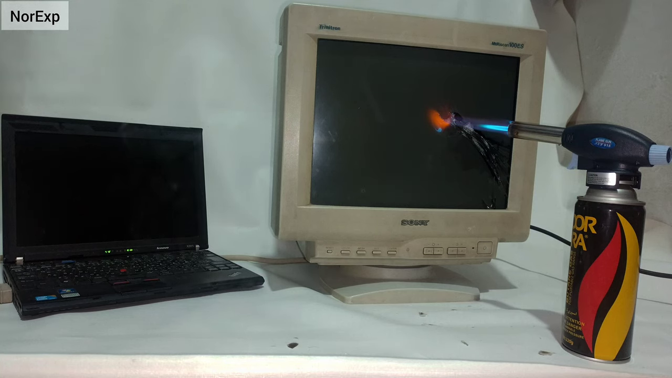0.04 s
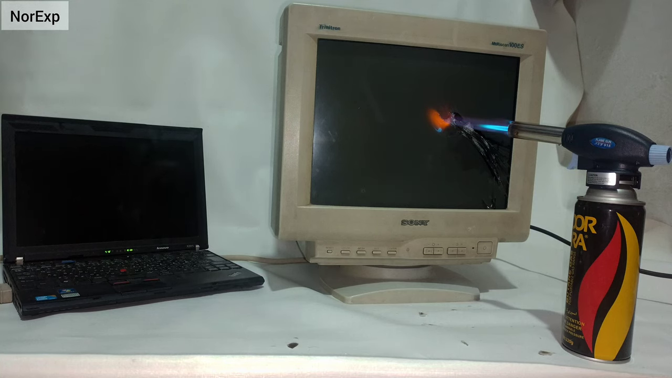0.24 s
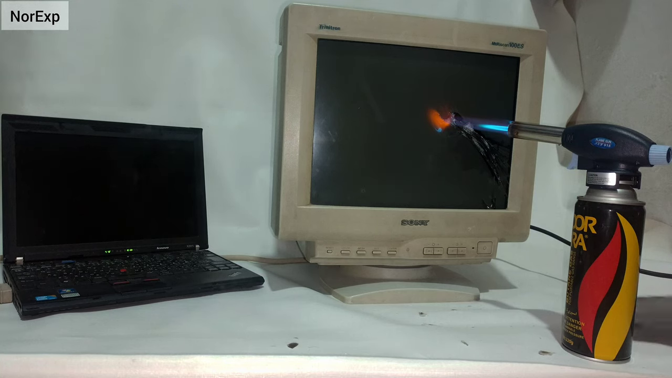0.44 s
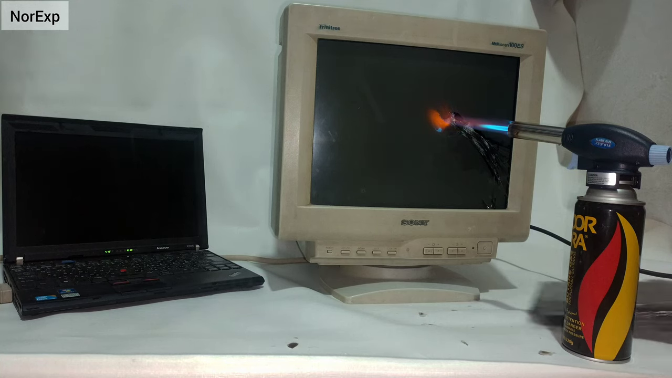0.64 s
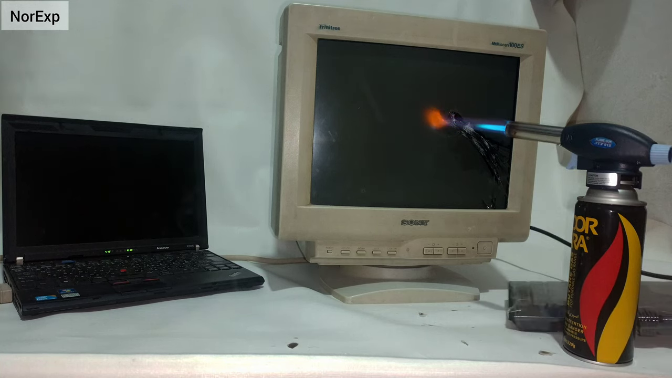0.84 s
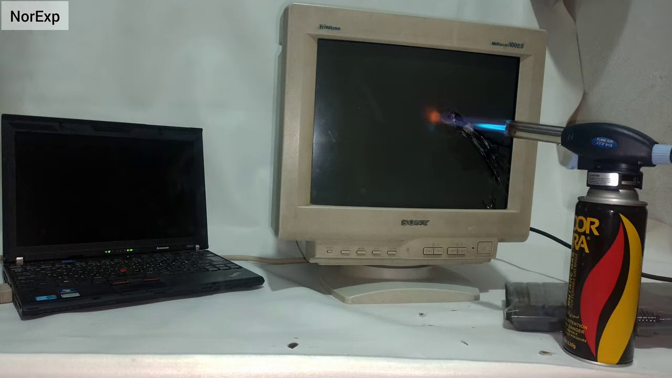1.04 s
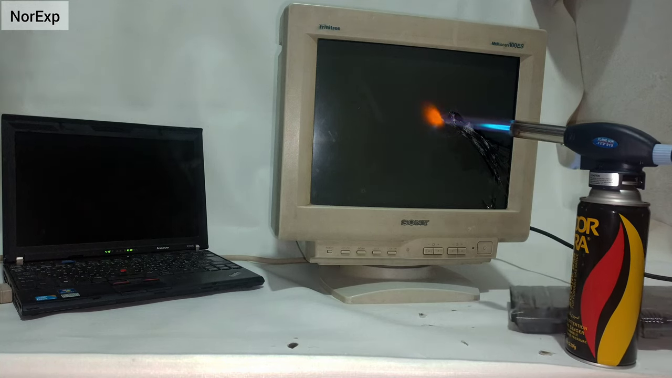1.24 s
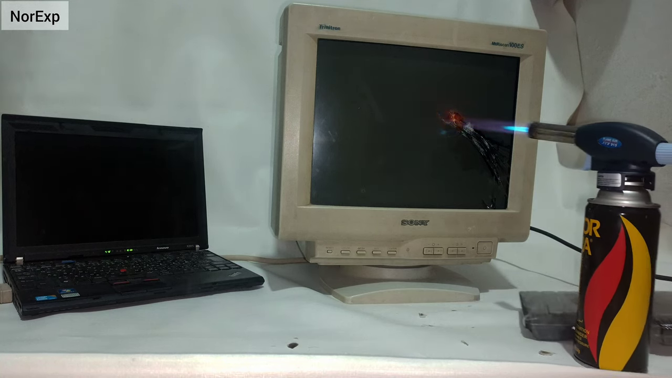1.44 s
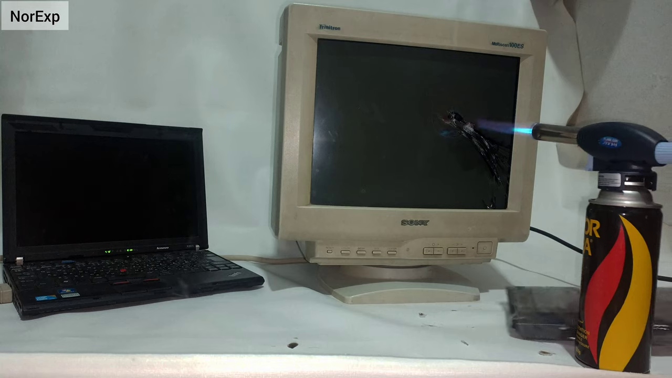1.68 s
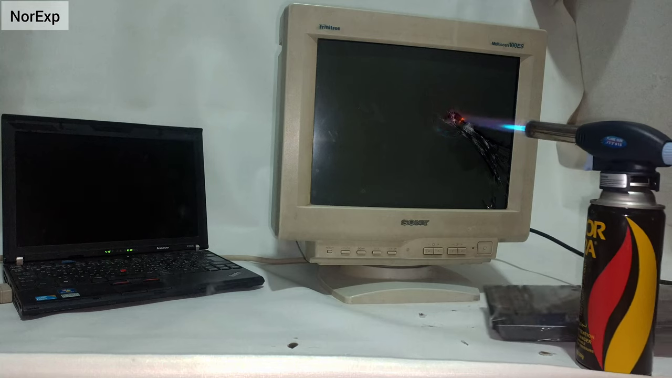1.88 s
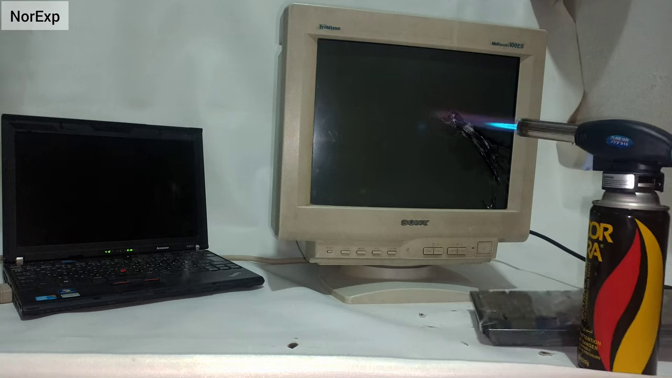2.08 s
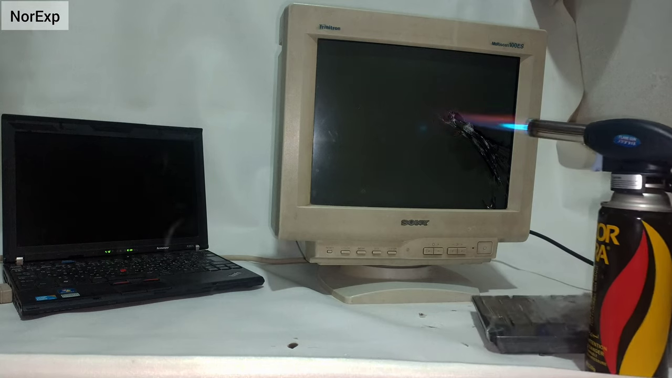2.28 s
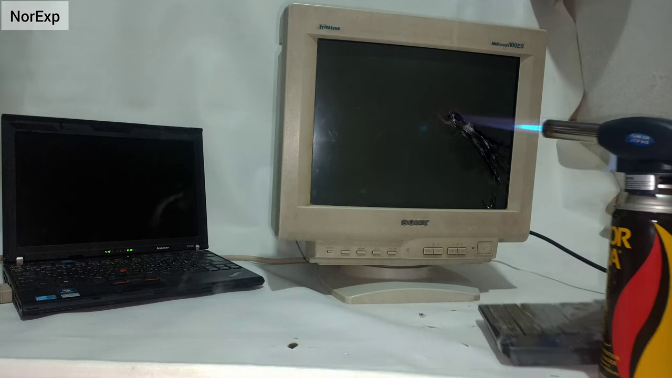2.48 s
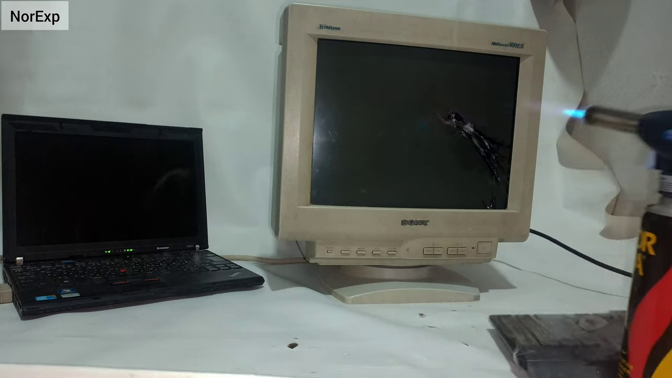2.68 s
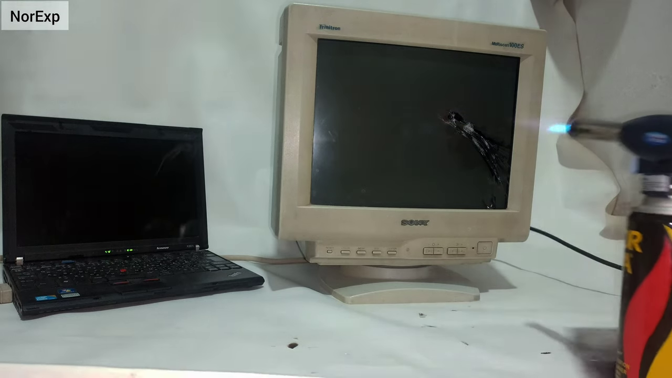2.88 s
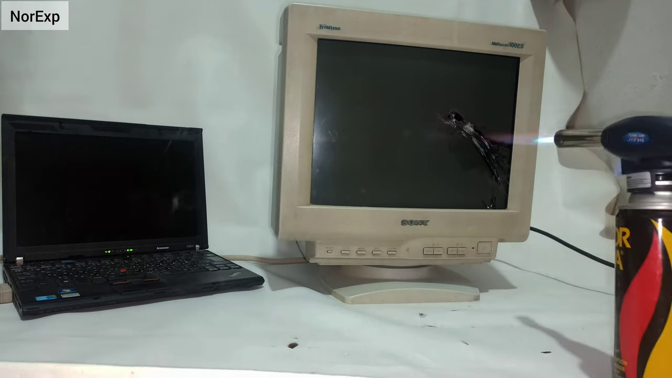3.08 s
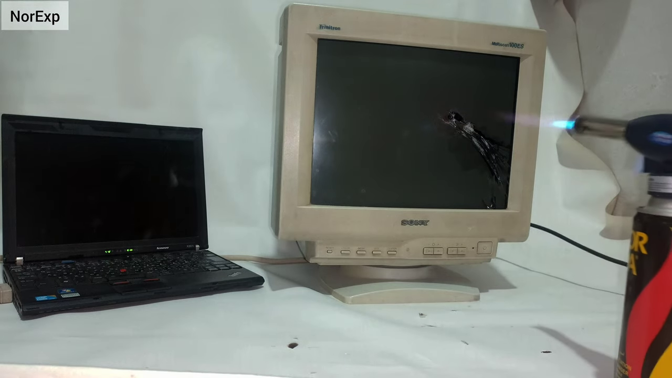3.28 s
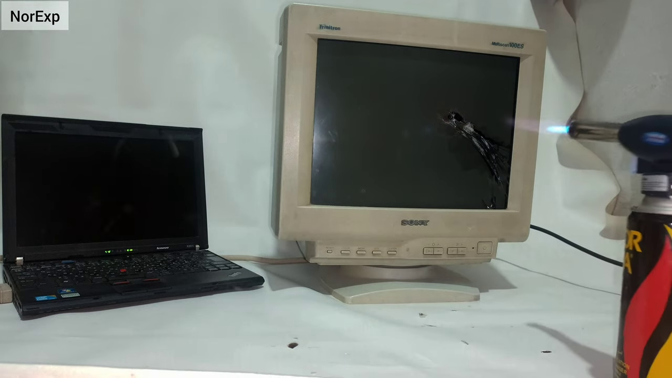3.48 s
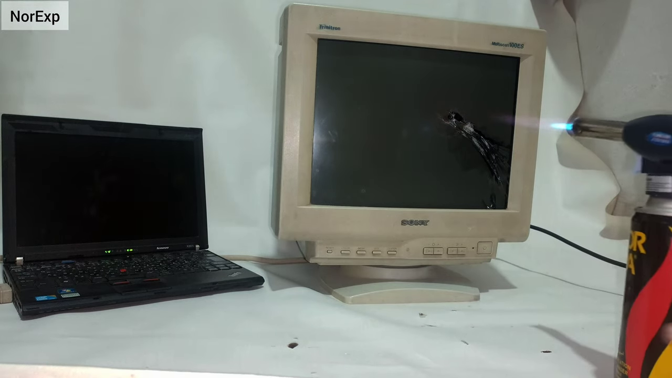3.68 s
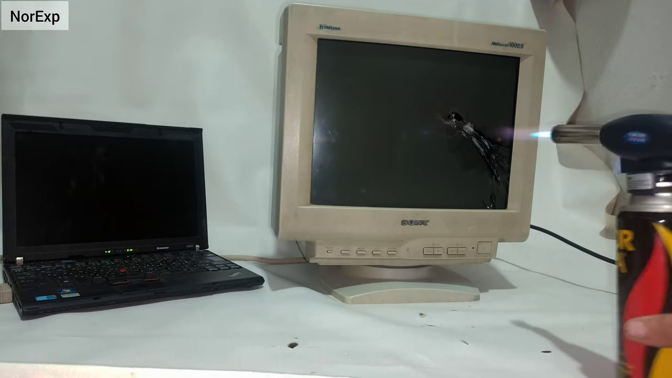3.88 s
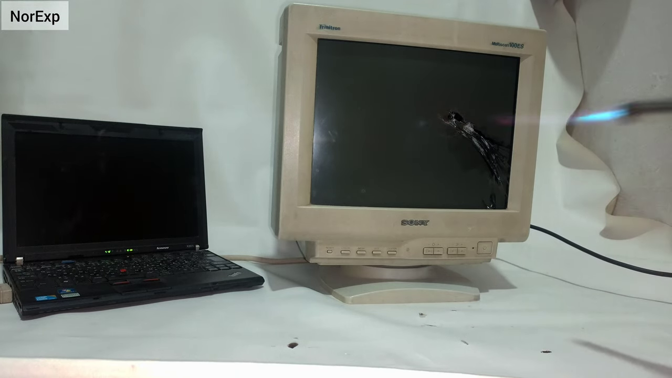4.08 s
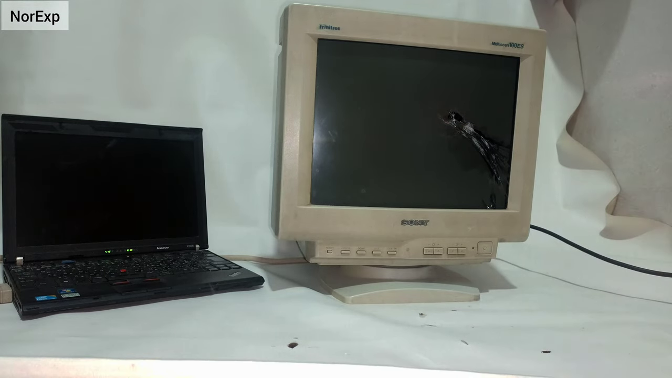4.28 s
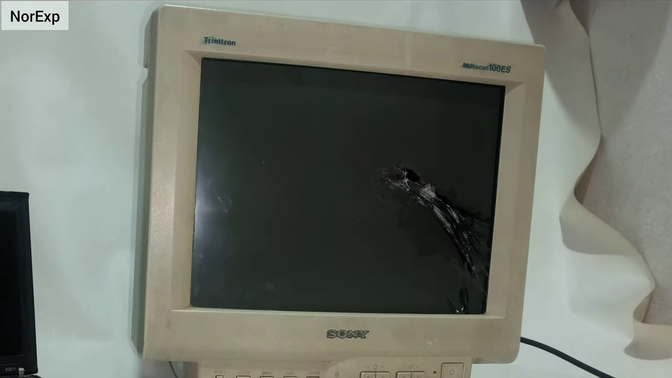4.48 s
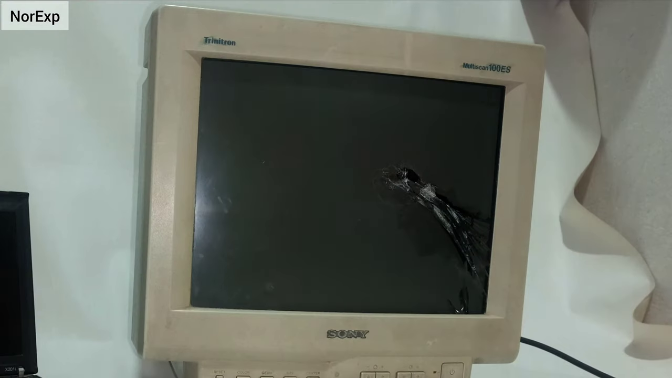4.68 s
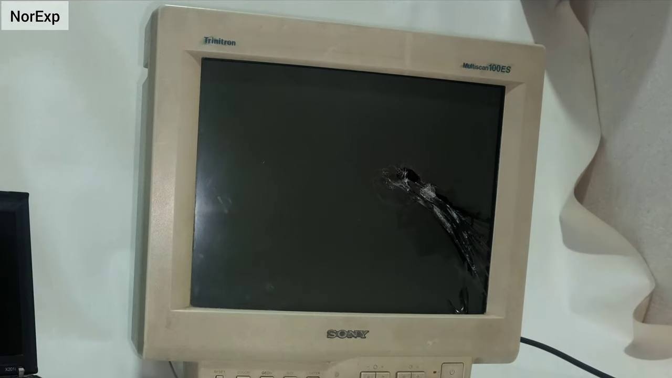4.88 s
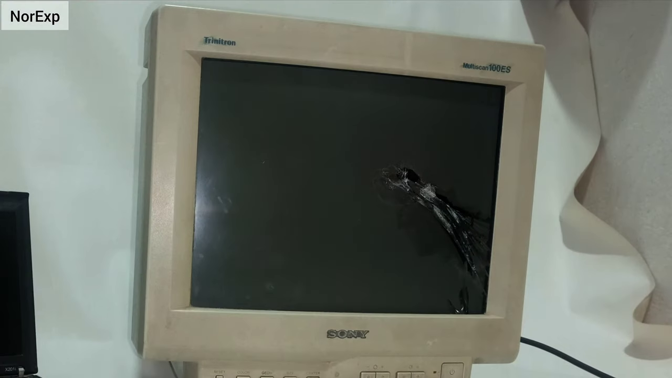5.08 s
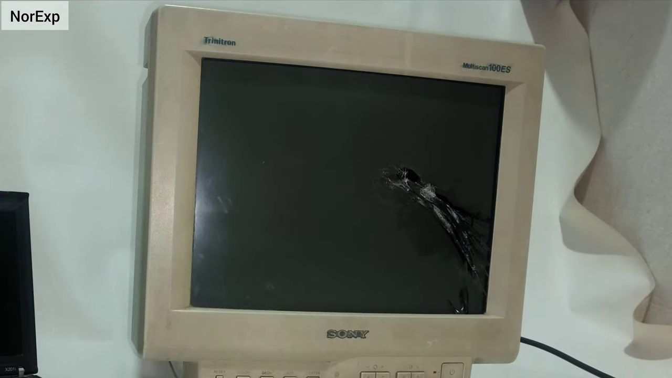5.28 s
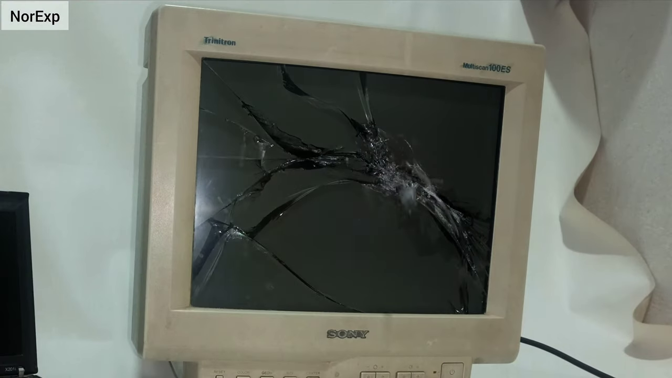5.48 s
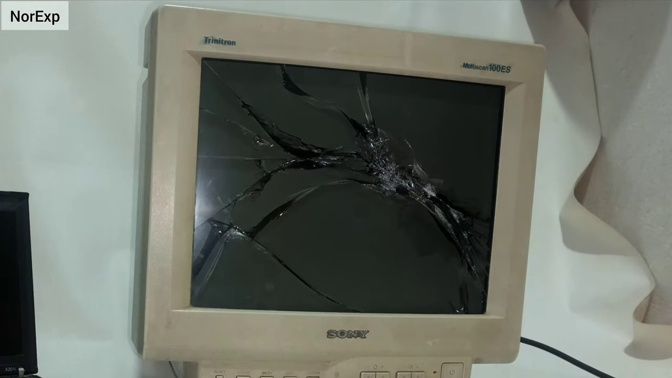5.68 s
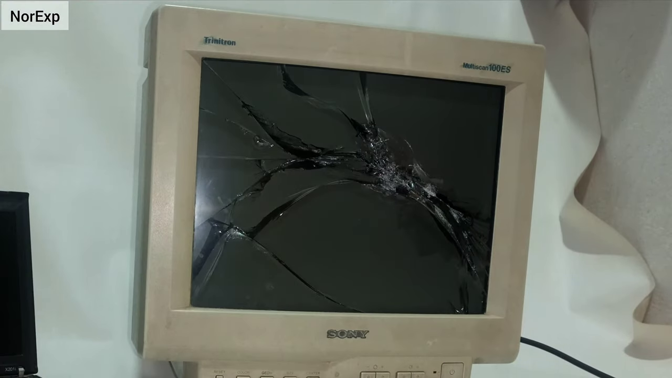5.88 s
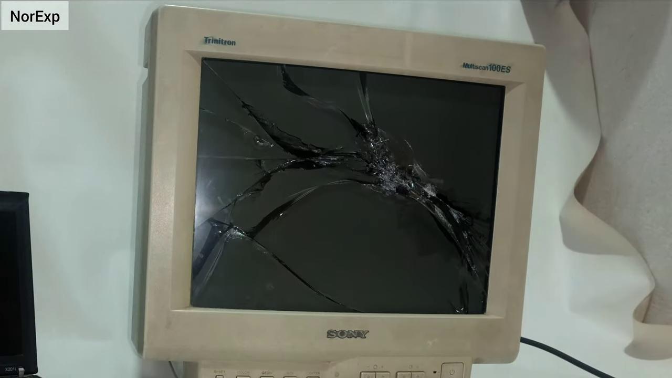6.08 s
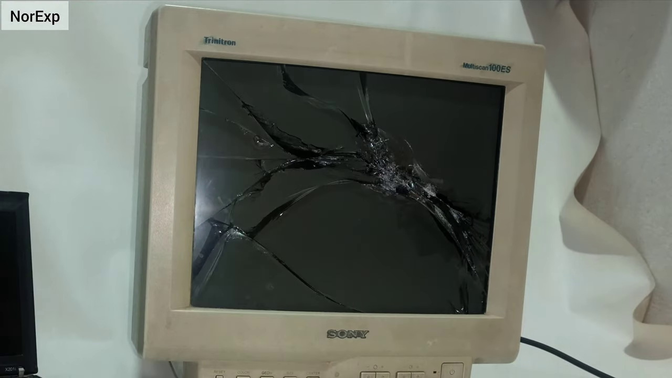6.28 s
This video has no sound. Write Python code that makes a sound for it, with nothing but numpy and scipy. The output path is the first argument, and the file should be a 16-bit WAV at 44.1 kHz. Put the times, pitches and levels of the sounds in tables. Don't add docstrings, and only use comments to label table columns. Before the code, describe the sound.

From the start a gas torch burns close to the microphone in a small room: a low, fluttering roar under a broad rushing hiss. Around 0.7 s a dull bump lands on the table, and at 0.84 s the steel can gets a knock with a brief thin ring. Glass ticks at 1.5 s, then more thickly from 2.85 to 3.4 s, with a few later clicks, as the flame draws back and its roar thins. At 4.35 s the torch vanishes abruptly into near silence: faint wavering hum, rumble, air and tiny cooling ticks. At 5.53 s a loud, sharp snap rings the heavy glass low and briefly, and a bright crackling rush of fractures spreads. Splinters and grit fall; heavier pieces rattle in a dense, damped cluster from 5.7 to 5.8 s, then thin out. A second, smaller crack comes at 6.12 s, followed by sparse tinkles to the end.

```python
import sys
import numpy as np
from scipy import signal
from scipy.fft import rfft, irfft, next_fast_len
from scipy.io import wavfile
from scipy.ndimage import uniform_filter1d, map_coordinates

SR = 44100
rng = np.random.default_rng(int(sys.argv[2]) if len(sys.argv) > 2 else 0)


def persist_wave(psi):
    counts = np.round(np.clip(psi, -1, 1) * 32767).astype(np.int16)
    wavfile.write(sys.argv[1], SR, np.atleast_2d(counts).T)


def gain_from_db(level_db):
    decades = np.asarray(level_db, float) / 20
    return 10 ** decades


N = 279594
CUT = 4.346
TOP_HZ = 15600


def unit(x):
    return x / np.sqrt(np.mean(x ** 2) + 1e-20)


def along(points, hz):
    f, v = np.transpose(points)
    return np.interp(np.log(hz + 1), np.log(f + 1), v)


def curves(rows):
    s, *cols = np.transpose(rows)
    return [np.interp(np.arange(N) / SR, s, c) for c in cols]


def wobble(rate):
    knots = rng.standard_normal(int(N * rate / SR) + 4)
    return map_coordinates(knots, [np.arange(N) * rate / SR])


def filtered(x, response):
    m = next_fast_len(len(x) + min(8192, 3 * len(x)))
    return irfft(rfft(x, m) * response(np.fft.rfftfreq(m, 1 / SR)), m)[:len(x)]


def coloured(x, spectrum):
    return unit(filtered(x, lambda hz: gain_from_db(along(spectrum, hz))))


def even(blow, share):
    spectrum = rfft(blow)
    return irfft(spectrum / (np.abs(spectrum) + 1e-9) ** share, len(blow))


def add(track, s, sound):
    spot = track[round(s * SR):][:len(sound)]
    spot += sound[:len(spot)]


def patchy(patchy_db, drift_db=0):
    z = signal.stft(rng.standard_normal(N), nperseg=512)[2]
    field = uniform_filter1d(uniform_filter1d(rng.standard_normal(z.shape), 5, 0), 12, 1)
    ridges = uniform_filter1d(uniform_filter1d(rng.standard_normal(z.shape), 4, 0), 110, 1)
    gain_db = patchy_db * unit(field) + drift_db * unit(ridges)
    return signal.istft(z * gain_from_db(gain_db), nperseg=512)[1][:N]


def breaks(rate, spread_db):
    size = gain_from_db(spread_db * np.minimum(rng.exponential(size=N), 2))
    return unit((rng.random(N) < rate / SR) * np.sign(rng.standard_normal(N)) * size)


def ring(modes, length, attack=0.00062):
    t = np.arange(int(length * SR)) / SR
    total = 0
    for hz, db, t60 in modes:
        drift = np.cumsum(rng.standard_normal(len(t))) * hz * 2e-6
        total = total + gain_from_db(db - 60 * t / t60) * np.sin(2 * np.pi * hz * t + drift)
    return (1 - np.exp(-t / attack)) * total


# pitch_hz [Hz], t60_s [s]
ROOM = [(200, 0.19), (2000, 0.2), (8000, 0.2), (15000, 0.084)]


def echoed(sound, wet_db):
    hz, t, z = signal.stft(rng.standard_normal(SR // 3), SR, nperseg=256)
    tail = signal.istft(z * gain_from_db(-60 * t / along(ROOM, hz)[:, None]), SR, nperseg=256)[1]
    late_tail = np.pad(tail / np.linalg.norm(tail), (130, 0))
    wet = gain_from_db(wet_db) * signal.fftconvolve(sound, late_tail)
    add(wet, 0, sound)
    return wet


# pitch_hz [Hz], level_db [dB per Hz]
CLICK = [(100, -41), (500, -2.5), (2000, -2), (6500, -4.5), (9500, -5.5), (10500, -17.5), (13500, -21.5),
         (15200, -11.5), (16500, -24)]


def as_click(x):
    return coloured(x, CLICK)


# middle_s [s], half_length_s [s], from_hz [Hz], to_hz [Hz], level_db [dB]
COMBING = [(1.4, .35, 3500, 4800, 2), (1.75, 0.77, 1500, 1340, 3), (2.15, 0.61, 960, 750, -6.5),
           (2.04, 0.53, 3900, 3300, -4.5), (1.82, 0.29, 3350, 3200, 4.5), (2.2, .5, 8300, 8800, 0),
           (2.25, 0.37, 12000, 9200, -3.5), (3.8, 0.1, 1100, 980, 3), (2.88, 0.24, 1800, 1600, 1),
           (4.17, 0.14, 5400, 3800, 5), (4, 0.17, 650, 760, 2), (4.3, 0.21, 396, 360, -8),
           (3.55, 0.23, 3200, 3100, 2), (2.95, 0.16, 7100, 6800, 1.5), (1.28, 0.31, 6300, 6800, -1),
           (.5, .4, 6400, 6200, 1.5), (1.8, .4, 11500, 11200, 1.5), (4.31, 0.043, 11300, 8800, 5),
           (3.74, 0.4, 740, 680, -6.5), (1.5, 0.21, 990, 680, -2.5), (1.27, 0.23, 3700, 4100, -3.5),
           (0.14, 0.13, 410, 360, -4)]


def combed(x):
    half_width_octaves = 0.17
    hz, t, z = signal.stft(x, SR, nperseg=1024)
    gain_db = 0
    for s, half, from_hz, to_hz, db in COMBING:
        u = np.clip((t - s) / half, -1, 1)
        centre = from_hz + (to_hz - from_hz) * (u + 1) / 2
        octaves_off = np.log2((hz[:, None] + 1) / centre)
        gain_db = gain_db + db * (1 - u ** 4) * np.exp(-(octaves_off / half_width_octaves) ** 2)
    return signal.istft(z * gain_from_db(gain_db), nperseg=1024)[1][:N]


def sizzle():
    rest_db, stirred_db, stirred_s = -54.5, -31.5, 0.054
    t = np.arange(N) / SR
    gain = gain_from_db(rest_db)
    for s, db, hz, *_ in HOT:
        if hz > 4500:
            gain = gain + gain_from_db(db + stirred_db) * np.exp(-np.abs(t - s) / stirred_s)
    return gain * as_click(echoed(breaks(rate=1200, spread_db=3.5), wet_db=-3.5)[:N])


# pitch_hz [Hz], level_db [dB per Hz]
ROAR_ON = [(18, -74.5), (30, -30.5), (65, -19.5), (100, -18), (150, -13.5), (282, -3.5), (319, -12.5),
           (362, -1), (459, 1.5), (555, -4.5), (703, -2.5), (919, -17), (1030, -10.5), (1300, -44.5),
           (1690, -60.5), (2860, -120)]
ROAR_OFF = [(18, -65), (38, -43), (60, -16), (100, -14.5), (167, -11.5), (209, -6), (314, -8), (368, 1.5),
            (411, -8), (459, -2), (555, -17), (725, -13.5), (863, -10), (1300, -24), (1690, -43.5),
            (2860, -120)]
RUSH_ON = [(710, -44.5), (1200, -18), (1450, -4), (1590, 1.5), (2020, -5), (2190, 0.5), (2410, -3),
           (3070, 1), (4040, -7.5), (4600, -9.5), (5980, -38.5), (10100, -120)]
RUSH_OFF = [(710, -25.5), (1200, 0.5), (1300, -2.5), (1400, 2), (1620, -5.5), (1890, 1.5), (2670, -6),
            (3190, -1.5), (3610, -7.5), (4600, -3.5), (5980, -33), (10100, -120)]
HISS_ON = [(2530, -45.5), (4300, -15.5), (5000, -1.5), (5670, -4.5), (6350, 6.5), (6740, 2), (7600, -20),
           (8650, -16.5), (9330, -6.5), (10500, -25.5), (11300, -20), (12300, -30), (14000, -34.5),
           (14900, -18.5), (15700, -29.5)]
HISS_OFF = [(2530, -34.5), (4300, -16.5), (5090, -2.5), (5980, -10), (6600, 1), (6960, -4.5), (7640, -19),
            (9380, -5.5), (9800, -9), (10100, -27.5), (10500, -18), (11300, -17), (13600, -36.5),
            (14900, -20.5), (15700, -14.5)]
# time_s [s], gas_flow_db [dB], drawn_off [0-1]
FLAME = [(0, -0.5, 0.03), (.4, -1, 0.27), (.66, 0, 0.2), (1.0, 0, 0.22), (1.45, 0.5, 0.35),
         (1.6, -0.5, 0.26), (2.3, 1.6, 0.56), (2.8, 0, 0.87), (3.1, -0.9, 0.78), (3.45, -0.2, 0.81),
         (3.9, -1, 0.69), (4.16, 0.5, 0.83), (4.34, 2.5, 0.73)]


def torch():
    flow_db, away = curves(FLAME)
    away = np.clip(away, 0, 1)

    def walled(x, spectrum):
        return coloured(echoed(x, wet_db=-7.0)[:N], spectrum)

    def blend(x, on, off, u):
        mixed = unit((1 - u) * walled(x, on) + u * walled(x, off))
        return mixed * (1 + 0.34 * u * (1 - u))

    flutter = wobble(45)
    roar = blend(patchy(patchy_db=0.05), ROAR_ON, ROAR_OFF, away)
    roar = unit(gain_from_db(0.96 * flutter + 0.3 * wobble(7.8)) * roar)
    rush = blend(patchy(patchy_db=1.0, drift_db=1.5), RUSH_ON, RUSH_OFF, away)
    rush = unit(gain_from_db(0.24 * flutter) * rush)
    hiss = blend(patchy(patchy_db=1.0, drift_db=1.54), HISS_ON, HISS_OFF, away ** 0.75)
    hiss = unit(gain_from_db(0.53 * flutter + 0.58 * wobble(300)) * hiss)
    flame = gain_from_db(-34 - 5.5 * away + 0.18 * flow_db) * roar
    flame = flame + gain_from_db(-45 + 0.86 * away + 0.98 * flow_db) * rush
    flame = flame + gain_from_db(-42.5 - 2 * away + 1.2 * flow_db) * hiss
    lit = np.clip((CUT - np.arange(N) / SR) / 0.00044, 0, 1)
    return lit * filtered(combed(flame) + sizzle(), lambda hz: hz < TOP_HZ + 250)


# start_s [s], peak_db [dB], pitch_hz [Hz],
# t60_s [s]
BUMP = [(.671, -3.5, 280, .036), (.671, -20, 150, .1), (.703, -24, 430, .12), (.737, -25, 520, .12),
        (5.84, -51, 330, .15), (5.91, -50, 260, .15), (5.96, -54, 380, .15), (3.063, -22, 420, .06),
        (5.45, -62, 460, .15), (4.51, -65, 668, .4), (4.57, -62, 672, .3), (4.47, -72, 715, .25),
        (4.41, -79, 2200, .2), (4.74, -81, 2230, .2), (4.66, -67, 330, .25), (5.12, -70, 400, .15),
        (5.58, -50, 62, .35)]


def thuds():
    out = np.zeros(N)
    for s, db, hz, t60 in BUMP:
        add(out, s, ring([(hz, db, t60)], 0.396, attack=3 / hz))
    return out


# pitch_hz [Hz], level_db [dB]
MIC = [(6500, -1.5), (9500, 1.5), (10300, 0), (13500, -4), (15200, -3.5)]


def ticks(rows, t60, wet_db, grain, late):
    out, t, lead = np.zeros(N), np.arange(SR // 40) / SR, 44
    for s, db, hz, share, click_db in rows:
        grit = (t > 0) * grain * gain_from_db(-60 * t / t60) * rng.standard_normal(len(t))
        blow = even(np.roll(grit - 1. * (t == 0), lead), share=.7)
        width = hz * max(share, .03)

        def peak(f):
            resonance = 1j * f * width / (hz * hz - f * f + 1j * f * width)
            return gain_from_db(along(MIC, f)) * resonance ** 2

        burst = unit(filtered(blow, peak)) + gain_from_db(click_db + 3.5) * as_click(blow)
        burst = burst + gain_from_db(-13.0) * np.roll(burst, round(.0045 * SR))
        add(out, s + late - lead / SR, gain_from_db(db) * echoed(burst / np.abs(burst).max(), wet_db))
    return out


# start_s [s], peak_db
# [dB], pitch_hz [Hz], ring_width [share of pitch], click_db [dB]
HOT = [(.677, -25, 1020, 0.8, -9.5), (.683, -31, 2800, .5, -9.5), (0.8446, -23.5, 4200, .9, -0.5),
       (1.527, -24, 4050, 0.4, 3), (2.8562, -18.5, 5540, 1, -5), (2.862, -29, 4530, 0.67, -8),
       (2.953, -24, 1600, 0.92, -4), (2.957, -25.5, 3500, 1, -2.5), (2.9735, -28.5, 10000, .7, -5),
       (4.105, -37, 12000, .7, -5.5), (4.163, -40, 12500, .6, -5), (3.094, -32, 2000, .3, -12),
       (2.973, -27.5, 1400, .6, -13), (2.983, -27, 2000, 0.54, -1), (3.082, -25.5, 5470, 0.7, -9.5),
       (3.114, -19, 4970, 0.8, -6), (3.115, -29, 2000, .3, -16), (3.135, -23, 5500, 1, -5.5),
       (3.139, -27, 3200, .5, -2), (3.145, -32, 2800, .5, -5.5), (3.1905, -32, 7540, 0.44, -6.5),
       (3.1993, -19, 6760, 0.48, -2.5), (3.1995, -24, 2050, 0.64, -15), (3.21, -42, 9000, .6, 1.5),
       (3.245, -36.5, 11000, 0.74, 2.5), (2.81, -42, 9000, .6, -5), (3.271, -26.5, 1300, 0.7, -7.5),
       (3.274, -25, 2200, .8, -4), (3.369, -24.5, 1400, 1, -22), (3.379, -26, 1090, 0.99, -10),
       (3.652, -23, 1100, 0.99, -2), (3.6552, -24.5, 990, .8, -7.5), (3.659, -32, 1300, 0.96, -4),
       (3.357, -29, 1500, 0.65, -8), (3.388, -31, 1300, .8, -8), (3.396, -36, 1000, 0.88, -3),
       (3.97, -32, 1500, 0.77, -13.5), (4.032, -23, 5440, 0.35, 6)]


def hot_glass():
    return ticks(HOT, t60=0.0062, wet_db=-5, grain=.5, late=.0005)


# start_s [s], peak_db [dB]
KNOCK = [
    (.844, -21.5),
]
# pitch_hz [Hz], level_db [dB], t60_s [s]
CAN = [(1008, -5, 1.6), (1010.6, -14, .9), (2843, -9.5, .5), (2852.5, -10.5, .55), (2960, -8, .36),
       (3273, -16, .15), (3876, -9, .32), (3893, -9, .32), (3779, -14, .24), (4409, -8, .3), (4520, -8, .2),
       (4833, -12, .35), (7564, -10, .12), (8180, -14, .12)]


def can():
    out, t = np.zeros(N), np.arange(SR // 10) / SR
    for s, db in KNOCK:
        clack = gain_from_db(-9.0 - 60 * t / 0.1) * as_click(rng.standard_normal(len(t)))
        add(out, s, gain_from_db(db) * echoed(clack, wet_db=1.0))
        add(out, s, gain_from_db(db - 5) * echoed(ring(CAN, .34, attack=.003), wet_db=-16))
    return out


# pitch_hz [Hz], level_db [dB per Hz]
RUMBLE = [(25, -43), (50, 1), (80, -5), (113, 5.5), (150, -2.5), (200, -12), (300, -31), (450, -37),
          (900, -120)]
AIR = [(150, -36), (250, -3.5), (600, -6), (1300, -13), (2300, -15.5), (5650, -21.5), (9300, -27),
       (10500, -32), (13500, -33), (15300, -26)]
# pitch_hz [Hz], wander_hz [Hz], level_db [dB]
HUM = [(592, 6, 0), (667, 6, -11), (2210, 25, -26)]
# middle_s [s], half_length_s [s], rumble_db [dB], hum_db [dB]
SPELLS = [(4.416, 0.078, -65, -72), (4.583, 0.12, -72, -69.5), (4.727, 0.13, -60.5, -76),
          (4.853, 0.056, -72, -82), (5.126, 0.097, -64, -71.5), (5.202, 0.07, -59, -90),
          (5.265, 0.055, -61, -66), (5.368, 0.088, -63, -76), (5.466, 0.052, -61, -78),
          (5.75, .3, -63, -77), (6.248, 0.77, -58.5, -71.5)]


def quiet_room():
    t = np.arange(N) / SR
    rumble_gain, hum_gain = gain_from_db(-79), gain_from_db(-90)
    for s, half, rumble_db, hum_db in SPELLS:
        spell = np.cos(np.pi / 2 * np.clip((t - s) / half, -1, 1)) ** 2
        rumble_gain = rumble_gain + gain_from_db(rumble_db) * spell
        hum_gain = hum_gain + gain_from_db(hum_db) * spell
    pumping = unit(hum_gain)
    hum = 0
    for hz, wander, db in HUM:
        level = gain_from_db(db + 3.5 * wobble(14))
        hum = hum + level * np.sin(2 * np.pi * np.cumsum(hz + wander * wobble(25)) / SR)
    whine = gain_from_db(-85 + 3.5 * wobble(12)) * pumping ** 0.26 * np.sin(2 * np.pi * 1319 * t)
    rumble = unit(gain_from_db(1.3 * wobble(23)) * coloured(rng.standard_normal(N), RUMBLE))
    air = gain_from_db(-76.5) * pumping ** 0.5 * coloured(patchy(patchy_db=2.5), AIR)
    return (t > CUT) * (rumble_gain * rumble + hum_gain * unit(hum) + air + whine)


# start_s [s], peak_db [dB], pitch_hz [Hz], ring_width [share of pitch], click_db [dB]
COOL = [(4.387, -59, 9000, 0.67, 15), (4.461, -57, 8000, 0.92, 18), (4.5335, -43.5, 8850, 1, -20),
        (4.538, -48, 9500, 1, -15), (4.5687, -54, 5670, .8, 0), (4.685, -57.5, 7960, 0.91, -4),
        (4.70, -62, 9000, .6, -3), (4.423, -70, 10000, .7, 0), (4.616, -68, 7000, .8, 0),
        (4.534, -58, 4000, .3, -15), (5.0057, -46.5, 2200, 0.94, -11.5), (5.006, -55, 6000, .4, -15),
        (5.006, -58, 233, 0.28, -23), (5.0655, -51, 8000, 1.3, -2), (5.1775, -49.5, 8500, 1.3, -7),
        (5.187, -56, 6000, 1.2, -4), (5.2559, -42, 5140, 1.7, 2), (5.405, -68, 10000, 0.5, -8)]


def cooling_glass():
    return ticks(COOL, t60=0.011, wet_db=-5.0, grain=1.6, late=.0005)


# start_s [s], snap_db [dB], body_db [dB], lowest_modes_db [dB], pitch [factor]
CRACKS = [
    (5.529, -1, -16.5, 3, 0.99),
    (5.5337, -22, -15.5, 8, 0.99),
    (6.1163, -12, -19.5, -33, 1.04),
]
# pitch_hz [Hz], level_db [dB], t60_s [s]
FACE = [(397, -6.5, 0.044), (469, 1, 0.058), (473, -21.5, 0.28), (608, -10.5, 0.078), (697, -26, 0.1),
        (818, -15, 0.1), (970, -15.5, .05), (1300, -17, 0.038), (169, -24, 0.066)]
# pitch_hz [Hz], level_db [dB per Hz]
SNAP = [(200, -26), (500, -2.5), (1800, 0), (3500, -5.5), (5900, 1.5), (7200, -5.5), (9500, -20),
        (11000, -21), (13200, -35), (15000, -17), (15600, -22), (16500, -6)]


def cracks():
    out, t, lead = np.zeros(N), np.arange(SR // 50) / SR, 20
    for s, snap_db, body_db, low_db, pitch in CRACKS:
        grit = 0.43 * gain_from_db(-60 * t / 0.01) * rng.standard_normal(len(t))
        snap = coloured(even(np.roll((t == 0) + grit, lead), share=1), SNAP)
        modes = [(hz * pitch, db + low_db * (hz < 430), t60) for hz, db, t60 in FACE]
        add(out, s - lead / SR, gain_from_db(snap_db) * echoed(snap / np.abs(snap).max(), wet_db=-7.5))
        add(out, s, gain_from_db(body_db) * echoed(ring(modes, .3), wet_db=-16.0))
    return out


# start_s [s], rise_s [s], hold_s [s], level_db [dB], dull_over_bright_db [dB]
RUNS = [(5.529, 0.0018, .004, -41.5, 15.5), (5.53, 0.016, 0.11, -23, -8), (5.663, 0.007, .004, -30, -1),
        (5.711, 0.0039, .002, -32.5, -2.5), (5.72, 0.046, 0.013, -29.5, -8),
        (5.753, 0.017, 0.025, -33.5, -20), (5.798, 0.043, 0.24, -44, -3.5),
        (6.039, 0.037, .008, -46.5, -10), (6.11, 0.0079, 0.0048, -30, -11), (6.201, 0.036, .006, -51, -3.5),
        (6.298, 0.021, .03, -56, -1)]
# pitch_hz [Hz], level_db [dB per Hz]
DULL = [(88, -43), (150, -4.5), (335, -5.5), (373, -3.5), (522, -3), (684, -9.5), (1210, -7.5), (2000, -20),
        (2600, -28), (4400, -120)]
BRIGHT = [(940, -39), (1600, -7), (2130, -1.5), (3300, 3), (4600, -1), (5400, 0.5), (7000, -4), (9300, -13),
          (10300, -21), (13300, -32), (15200, -17), (16000, -30)]


def running():
    sag_db_per_s, fade_db_per_s = 53, 303
    t, dull, bright = np.arange(N) / SR, 0, 0
    for s, rise, hold, db, dull_db in RUNS:
        since_peak = t - s - rise
        loss_db = sag_db_per_s * np.clip(since_peak, 0, hold)
        loss_db = loss_db + fade_db_per_s * np.maximum(since_peak - hold, 0)
        power = (np.clip((t - s) / rise, 0, 1) ** 2 * gain_from_db(db - loss_db)) ** 2
        dull = dull + power * gain_from_db(2 * dull_db)
        bright = bright + power
    grit = 0.27 * breaks(rate=2800, spread_db=3.0) + patchy(patchy_db=1.2)
    dull_rush = gain_from_db(-4.5) * np.sqrt(dull) * coloured(grit, DULL)
    return dull_rush + gain_from_db(-6.0) * np.sqrt(bright) * coloured(grit, BRIGHT)


# pitch_hz [Hz], level_db [dB per Hz]
DUST = [(4000, -41), (8000, -4), (12000, 0), (15500, -4)]


def dust():
    since = np.arange(N) / SR - RUNS[0][0]
    grains = echoed(breaks(rate=700, spread_db=2), wet_db=-3.0)[:N]
    return gain_from_db(-62 - 19 * since) * (since > 0) * coloured(grains, DUST)


# start_s [s], peak_db [dB], pitch_hz
# [Hz], ring_width [share of pitch], click_db [dB]
SPLINTERS = [(5.672, -21, 6570, 0.32, -4), (5.673, -27, 12100, 0.18, -9), (5.677, -23, 6000, 0.31, -6),
             (5.85, -51, 11000, .5, -9), (5.894, -37, 6300, 0.4, -9), (6.022, -54, 12000, 0.65, -3),
             (6.03, -44, 7000, 0.6, -12), (6.064, -56, 12000, .5, -5), (6.075, -51, 12500, .4, -3),
             (6.088, -42, 4570, .4, -12), (6.1158, -12, 6770, 0.8, -9), (6.224, -51, 5500, .7, -6),
             (6.238, -47, 9000, .6, -12), (6.308, -51, 6200, .7, -3), (6.316, -43, 2260, 0.1, -3),
             (6.334, -57, 2200, 0.11, -10), (6.322, -47, 4500, .3, -10), (6.181, -48, 1850, .15, -5),
             (5.6025, -21.5, 1500, 1.1, -8), (5.562, -18, 3400, 0.27, -13), (5.887, -47, 8000, .4, -5),
             (5.5295, -15, 2100, 0.72, -8), (5.5345, -21, 6600, .4, 1), (5.535, -31, 10900, 0.33, -9),
             (5.5395, -20, 4470, .5, -3), (6.121, -26, 8450, .4, -3), (6.121, -36, 12500, .4, -9),
             (6.172, -50, 12500, .4, -6), (5.549, -20, 2400, .5, -11), (5.578, -26, 6000, .3, -6),
             (5.598, -27, 2800, .3, -9), (5.621, -27, 3400, .3, -12), (5.641, -28, 2600, 0.44, -10),
             (6.117, -31, 1500, 0.52, -3), (6.123, -34, 1100, 1, 1), (6.157, -42, 1550, .2, -7),
             (6.098, -46, 700, 0.43, -20), (6.235, -53, 1340, 0.11, -9), (6.328, -52, 4000, .3, -5)]


def splinters():
    return ticks(SPLINTERS, t60=0.0077, wet_db=-5.5, grain=1.0, late=0.00033)


# start_s [s], peak_db [dB], pitch_hz [Hz], click_db [dB]
RATTLE = [(5.7152, -17.5, 1490, -3), (5.7363, -16, 970, -9), (5.7426, -17.5, 1500, -10),
          (5.750, -22, 1100, -7), (5.7548, -25, 950, -12), (5.758, -17.5, 970, -9), (5.7629, -17, 1900, -4),
          (5.7655, -17, 1900, 2), (5.768, -18, 1270, -8), (5.7732, -15.5, 1120, -7.5),
          (5.778, -24, 1900, 1), (5.781, -26, 1250, -5), (5.7845, -26, 1500, 4), (5.7875, -27, 1400, 2),
          (5.797, -31, 1300, 2), (5.803, -29, 1200, 1), (5.810, -32, 1000, -10), (5.817, -38, 1250, -8),
          (5.835, -35, 1800, -2), (5.864, -34, 1200, 2), (5.870, -41, 1300, -8), (5.905, -27, 1080, -5.5),
          (5.920, -32, 1010, -2), (5.926, -37, 1100, -2), (5.935, -34, 950, -16), (5.972, -39, 1200, -4),
          (5.9753, -38, 3500, -4), (5.993, -36.5, 1200, -5)]


def rattle():
    rows = [(s, db, hz, 0.77, click_db) for s, db, hz, click_db in RATTLE]
    return ticks(rows, t60=0.0051, wet_db=-5.0, grain=0.45, late=.0001)


def scene():
    flame = torch() + thuds() + hot_glass() + can()
    cooling = quiet_room() + cooling_glass()
    split = cracks() + running() + dust() + splinters() + rattle()
    return (flame + cooling + split)[None]


def top_cut(x):
    return signal.sosfilt(signal.butter(12, 16870, fs=SR, output="sos"), x)


def record(dry):
    x = dry[0] / (1 + np.abs(dry[0] / .75) ** 4) ** (1 / 4)

    def chain(hz):
        top = gain_from_db(-13 * (1 + np.tanh((hz - TOP_HZ) / 90)))
        return top * hz ** 2 / (hz ** 2 + 42 ** 2)

    mix = filtered(x, chain)[None]
    return top_cut(mix)


dry = scene()
out = record(dry)
persist_wave(out)
```